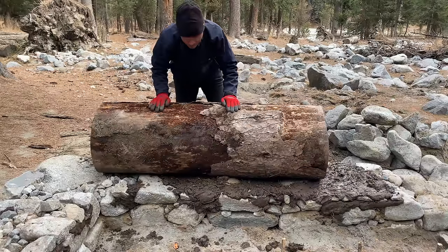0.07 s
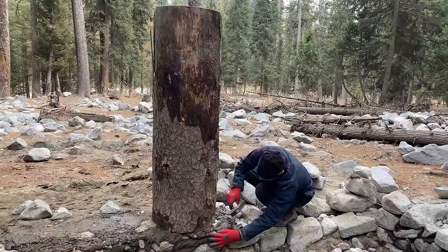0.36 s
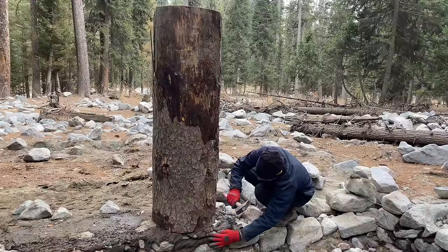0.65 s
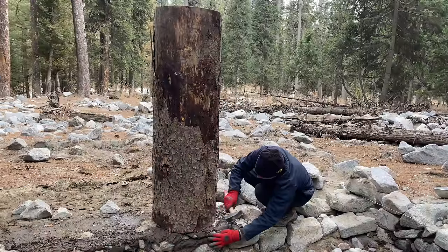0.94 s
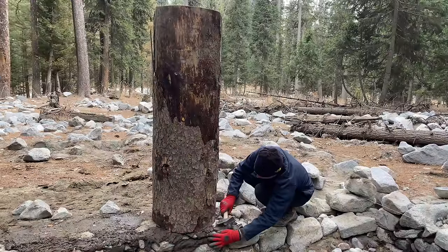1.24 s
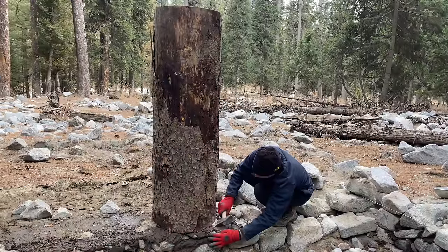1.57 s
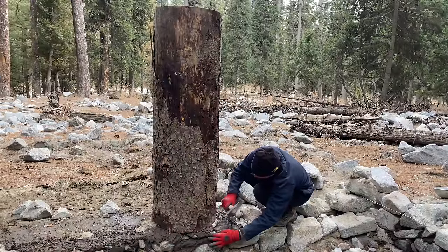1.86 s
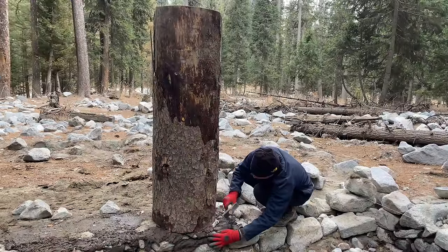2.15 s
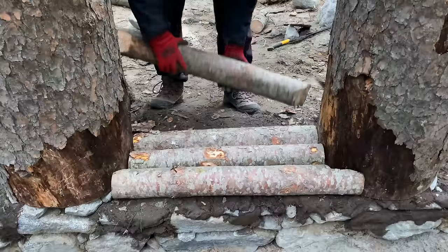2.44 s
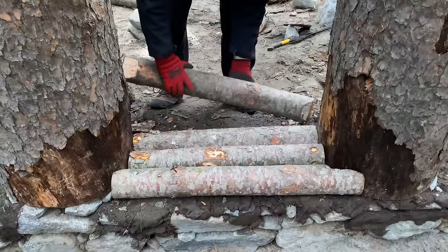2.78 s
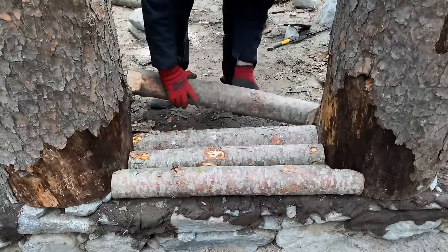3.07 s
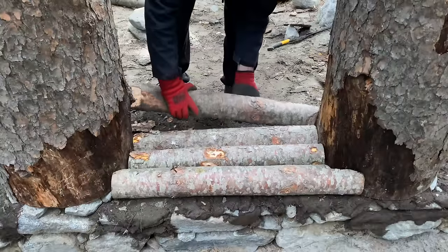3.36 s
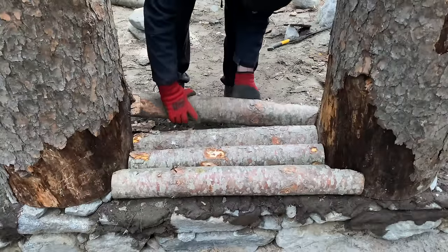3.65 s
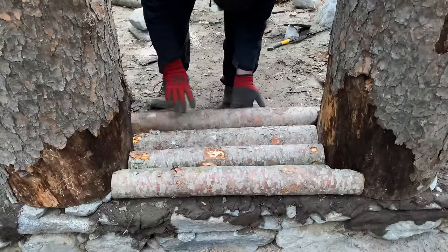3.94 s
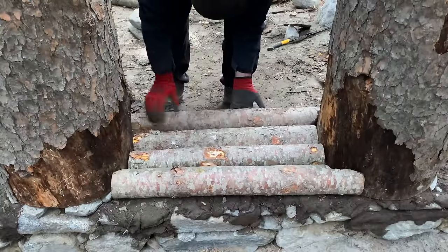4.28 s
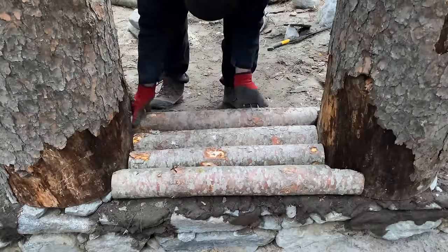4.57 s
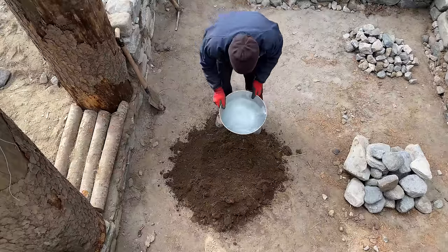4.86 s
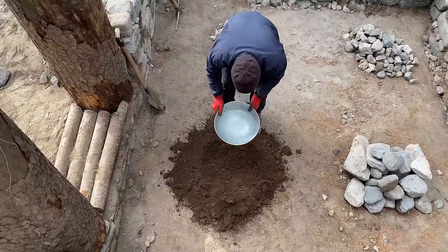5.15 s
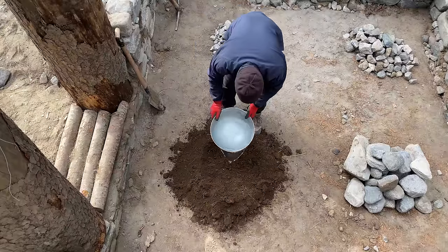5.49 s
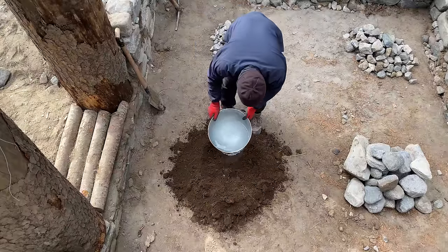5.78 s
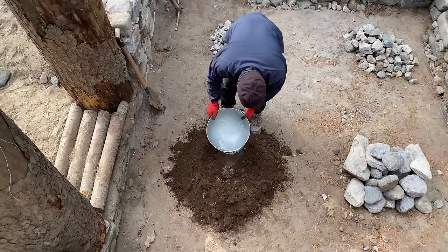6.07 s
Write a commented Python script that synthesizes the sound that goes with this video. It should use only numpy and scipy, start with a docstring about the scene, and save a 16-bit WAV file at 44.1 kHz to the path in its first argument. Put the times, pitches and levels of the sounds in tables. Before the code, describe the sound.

A hammer knocks a steel wedge into wood four times in a quiet forest; later a pole knocks into place and water trickles onto soil.

```python
"""Four hammer blows drive a steel wedge at the foot of an upright log in a conifer forest.
Each blow crushes fibres and makes wood and steel ring; the trees throw back a faint echo.
Then gloves rustle on bark, a wooden pole drops into place, and water starts to pour from a basin,
pattering on loose soil. A distant hush and a low rumble of air lie under everything;
wind puffs twice at the start, and a far stream comes in near the end."""
import sys
import numpy as np
from scipy import signal
from scipy.fft import rfft, irfft, next_fast_len
from scipy.io import wavfile

SR = 44100
rng = np.random.default_rng(int(sys.argv[2]) if len(sys.argv) > 2 else 0)


def generate_wav(signal):
    """Clip the signal to [-1, 1] and save it as 16-bit WAV at the path in sys.argv[1]."""
    frames = np.transpose(np.atleast_2d(signal))
    scaled = np.clip(frames, -1, 1) * 32767
    pcm = np.round(scaled).astype(np.int16)
    wavfile.write(sys.argv[1], SR, pcm)


N = 278756
TIME = np.arange(N) / SR
AGE = TIME[:SR]   # the first second after a hit

# low rumble of the air: (frequency [Hz], level [dB per Hz])
RUMBLE = [(22, -26.5), (45, -5), (65, 3), (91, 2), (129, -4.5), (166, -6), (220, -14.5)]
# distant hush of the forest: (frequency [Hz], level [dB per Hz])
HUSH = [(88, -36), (150, -7), (178, -7), (283, -9.5), (371, -8), (589, -7), (757, -11), (1110, -16),
        (1270, -16.5), (1730, -18.5), (3030, -30.5), (7500, -44.5), (8250, -49.5), (10600, -41),
        (15000, -64.5)]
# the far stream: (frequency [Hz], level [dB per Hz])
STREAM = [(250, -9.5), (340, 0.5), (470, -2), (600, -6), (800, -19), (1500, -17), (2200, -26.5)]
# wind on the microphone: (frequency [Hz], level [dB per Hz])
WIND = [(26, -22), (44, -5), (70, -10.5), (140, -40)]
# puffs of that wind: (time [s], level [dB])
PUFFS = [(0.02, -49.5), (0.155, -48.5)]

# bits of bark falling away: (frequency [Hz], level [dB per Hz])
CRUMBS = [(1800, -13.5), (2700, -2), (3400, 2), (4200, -6), (5200, 2), (6200, -4), (7200, -13),
          (11000, -29.5), (15000, -30.5)]
# bark and grit ticking: (time [s], level [dB])
TICKS = [(0.093, -48), (0.106, -54), (1.1595, -36), (2.543, -44), (2.582, -52), (2.627, -47), (2.760, -51),
         (2.778, -54), (4.491, -52)]
# cloth on bark: (frequency [Hz], level [dB per Hz])
CLOTH = [(1200, -12), (2500, 0), (4000, -2.5), (6000, -6), (8000, -8), (10000, 2.5), (12000, -12.5),
         (14000, -8.5), (16000, -16)]
# cloth strokes: (full-speed time [s], relative level [dB], swell [s], hold [s], fade [s], cutoff [Hz])
STROKES = [(0.09, -77, .06, .02, .15, 19000), (0.25, -79, .03, .1, .2, 19000),
           (2.24, -82.5, .04, .28, .05, 19000), (2.54, -71.5, .05, .21, .08, 19000),
           (2.76, -66, .012, .005, .06, 19000), (3.29, -62.5, .04, .008, .085, 10000),
           (3.51, -67.5, .13, .015, .09, 10000), (3.775, -56.5, .07, .082, .065, 19000),
           (4.108, -66.5, .035, .004, .16, 19000), (4.265, -65.5, .055, .012, .135, 19000),
           (4.47, -61, .085, .022, .018, 19000), (4.575, -73, .04, .09, .08, 19000),
           (4.705, -70.5, .08, .023, .012, 19000)]

# water pattering on soil: (frequency [Hz], level [dB per Hz])
PATTER = [(900, -10), (2000, -4.5), (3300, -2), (4500, -3.5), (6500, -7), (8000, -5), (10000, -2.5),
          (12000, -12), (14000, -14), (16000, -24)]
# sloshes that bring more water at once: (time [s], relative level [dB])
SLOSHES = [(5.617, -62.5), (5.785, -65.5), (6.055, -64.5), (6.105, -60), (6.265, -64.5)]
# fat drops splashing: (time [s], level [dB], pitch [Hz])
SPLASHES = [(5.622, -65, 3400), (5.758, -51, 3200), (5.792, -51, 4000), (6.047, -57, 3700),
            (6.053, -45, 2780), (6.167, -55, 4200), (6.296, -47.5, 3900)]

# the pole's end sliding down the trunk: (full-speed time [s], level [dB], swell [s], hold [s], fade [s])
POLE_SLIDE = (3.944, -53, .028, .012, .075)
# wood scraping on bark: (frequency [Hz], level [dB per Hz])
SCRAPING = [(2500, -12), (4000, -8.5), (6500, -9), (7800, 0), (9800, 1), (11500, -7.5), (15000, -17)]
# bark snapping on bark: (frequency [Hz], level [dB per Hz])
BARK = [(1500, -3), (2100, 6), (2900, -4), (3700, 5), (4600, -9), (7000, -13), (9500, -2), (12000, -13),
        (15000, -17)]
# the pole landing on its neighbours: (time [s], click [dB], knock [dB], bed [dB], ground [dB])
POLE_DROPS = [(3.9720, -17.3, -23.5, -64, -61), (3.9840, -39, -59, -21.3, -38), (4.057, -75, -75, -51, -47)]
# the pole ringing: (pitch [Hz], level [dB], ring time [s])
POLE_TONES = [(265, -5, 0.065), (324, -8.5, 0.1), (420, -17, 0.039), (478, 1.5, 0.055), (650, -7.5, 0.035),
              (804, -6, 0.028), (1000, -16, .04)]
# its bed, the row of poles and soil that carry it: (pitch [Hz], level [dB], ring time [s])
BED_TONES = [(122, -3, 0.086), (173, 0, 0.058), (406, -6.5, 0.14)]
# the ground thudding: (frequency [Hz], level [dB per Hz])
GROUND = [(35, -16), (70, -1), (130, -3.5), (250, -1.5), (400, -12), (900, -37.5)]

# hammer blows: (time [s], crack [dB], crack pitch [Hz], splinters [dB], crush time [s],
# splinter cutoff [Hz], knock [dB], clack [dB], trunk [dB], wedge [dB], hammer head [dB], ground [dB])
BLOWS = [(0.7517, -4, 2760, -18, 0.039, 6000, -23.5, -45, -32, -30.5, -32, -34),
         (1.1685, -4.5, 3500, -21, 0.046, 9424, -19.3, -35, -27, -12, -32, -37),
         (1.5381, -9, 3290, -17, 0.041, 8550, -14, -21.5, -36.5, -14.5, -26, -29.5),
         (1.9056, -13.5, 2070, -15.5, 0.023, 5700, -12.8, -15.2, -20.5, -39.5, -37.5, -33)]
# crushed fibres and grit: (frequency [Hz], level [dB per Hz])
SPLINTERS = [(200, -12.5), (400, -3.5), (800, -0.5), (1100, -3), (1700, -6.5), (2300, -5.5), (3400, -2),
             (4500, -6.5), (6000, -8.5), (8000, -11), (11000, -10), (15000, -24.5)]
# wood around the wedge: (pitch [Hz], level [dB], ring time [s])
KNOCK_TONES = [(495, -9, 0.08), (584, 0.5, 0.056), (690, -4.5, .055), (803, -4, 0.066), (881, -4, .032),
               (1290, -16, .035), (2940, -12, 0.039), (3230, -17, .035), (3543, -14.5, 0.031)]
# the stiff lip of the cut: (pitch [Hz], level [dB], ring time [s])
CLACK_TONES = [(1861, -10, 0.027), (2223, 0.5, 0.035), (4310, -8, 0.028), (5360, -10.5, .025)]
# the whole trunk: (pitch [Hz], level [dB], ring time [s])
TRUNK_TONES = [(379, 1.5, .085), (411, -4, 0.11), (436, -2, 0.19)]
# the steel wedge, damped by the wood that grips it: (pitch [Hz], level [dB], ring time [s])
WEDGE_TONES = [(6600, -7.5, .04), (6745, -1, .05), (6934, -6.5, .04), (9900, -16, .025), (10170, -5, .04),
               (10250, -15.5, 0.033), (11100, -15, 0.053), (10930, -14.5, 0.034)]
# the hammer head: (pitch [Hz], level [dB], ring time [s])
HEAD_TONES = [(9430, 2.5, .095), (13562, -12, .09), (14782, -15, .045)]
# sound thrown back by the trees: (frequency [Hz], level [dB per Hz])
TREE_ECHO = [(200, -5.5), (600, 0), (1300, -4.5), (2500, -0.5), (3800, -2.5), (5500, -8), (7000, -13.5),
             (8500, -23.5), (11000, -21), (15000, -33.5)]

# how alike the air sounds on both sides: (frequency [Hz], likeness [0-1])
AIR_LIKENESS = [(60, 1), (290, 0.7), (640, 0.5), (1400, .35), (3100, .5), (7000, .3), (15000, .1)]
# how much louder the background is on the left: (frequency [Hz], left minus right [dB])
AIR_BALANCE = [(60, 3), (110, 5), (200, 8), (380, 4.5), (700, 2), (1300, 5), (2400, 8), (4400, 10.5),
               (8000, 3), (15000, -3.5)]
# the same for near sounds: (frequency [Hz], left minus right [dB])
NEAR_BALANCE = [(60, 2.5), (200, 9), (400, 5.5), (700, 5.5), (1300, 7.5), (2400, 11), (4400, 9.5),
                (6800, 6.5), (9000, 0.5), (15000, -.5)]
# how far near sounds run ahead on the left: (frequency [Hz], phase lead [radians])
NEAR_LEAD = [(300, -0.12), (850, .5), (1350, -.6), (2000, .1), (3000, -0.91), (4200, 0.41), (5500, 2.04),
             (6700, 1.06), (9000, 0.19), (15000, 0)]
# resonances of the left microphone opening: (frequency [Hz], sharpness [Q])
MIC_RESONANCES = [(8450, 6), (12250, 9.5)]


def from_db(db):
    """Turn decibels into a volume factor."""
    return 10 ** (np.asarray(db) / 20)


def unit_power(x):
    """Scale a signal to an average power of 1."""
    return x / np.sqrt(np.mean(x ** 2) + 1e-20)


def at_hz(points, hz):
    """Read between a table's rows on a log frequency scale."""
    known_hz, values = np.transpose(points)
    return np.interp(np.log(np.maximum(hz, 1)), np.log(known_hz), values)


def noise(spectrum, likeness, size=SR):
    """Stereo noise shaped by a table; likeness 1 makes both sides the same, 0 unrelated."""
    hz = np.arange(size // 2 + 1) * SR / size
    alike = np.clip(likeness if np.isscalar(likeness) else at_hz(likeness, hz), 0, 1)
    treble_cut = 1 / (1 + (hz / spectrum[-1][0]) ** 8)
    bass_cut = 1 - 1 / (1 + (hz / spectrum[0][0]) ** 4)
    colour = from_db(at_hz(spectrum, hz)) * treble_cut * bass_cut
    mid, side = rfft(rng.standard_normal((2, size))) * colour
    stereo = np.sqrt(1 + alike) * mid + np.sqrt(1 - alike) * side * [[1], [-1]]
    return unit_power(irfft(stereo, size))


def add(track, s, sound):
    """Mix a sound in from time s."""
    start = int(round(s * SR))
    track[..., start:start + sound.shape[-1]] += sound[..., :N - start]


def low_pass(x, hz):
    """Soften the treble above the cutoff hz."""
    return signal.sosfilt(signal.butter(2, min(hz, .45 * SR), fs=SR, output="sos"), x)


def fade(rise_s, ring_s):
    """Volume that rises, then dies away by 60 dB over the ring time."""
    return (1 - np.exp(-(AGE / rise_s) ** 2)) * from_db(-60 * AGE / ring_s)


def swell(s, db, swell_s, hold_s, fade_s):
    """Volume that peaks at time s, holds and fades; swell and fade times each span 20 dB."""
    early = np.maximum(s - TIME, 0)
    late = np.maximum(TIME - s - hold_s, 0)
    return from_db(db - 20 * np.minimum(early / swell_s + late / fade_s, 10))


def sets_in(s, db, swell_s, db_per_s):
    """Volume that reaches its level at time s, then keeps growing slowly."""
    return swell(s, db, swell_s, N / SR, 1) * from_db(db_per_s * np.maximum(TIME - s, 0))


def ring(tones, rise_s):
    """A struck object's dying tones, each about a decibel different on every hit."""
    out = np.zeros(SR)
    for k, (hz, db, ring_s) in enumerate(tones):
        strength = (-1) ** k * from_db(db + rng.standard_normal())
        out += strength * fade(rise_s, ring_s) * np.sin(2 * np.pi * hz * AGE)
    return out


def crack(hz, cycles):
    """Two hard things meet: a pressure pulse a wave or two long."""
    progress = AGE * hz / cycles
    return progress ** 2 * np.exp(2 - 2 * progress) * np.sin(2 * np.pi * hz * AGE)


def grains(per_s, spread_db):
    """Flickering volume from tiny random contacts, each about a millisecond long."""
    sizes = from_db(spread_db * np.minimum(rng.exponential(1, N), 4))
    contacts = sizes * (rng.random(N) < per_s / SR)
    power = signal.lfilter([1], [1, -np.exp(-1000 / SR)], contacts ** 2 + 1e-12)
    return unit_power(np.sqrt(power))


def forest_air():
    """The air rumbles steadily under the forest's distant hush."""
    rumble = from_db(-54.2) * noise(RUMBLE, AIR_LIKENESS, size=N)
    hush = from_db(-52.75) * noise(HUSH, AIR_LIKENESS, size=N)
    return rumble + hush


def far_stream():
    """Distant running water comes in and slowly grows louder."""
    return sets_in(s=4.76, db=-53.6, swell_s=.06, db_per_s=1.2) * noise(STREAM, .49, size=N)


def wind_puffs():
    """Wind bumps the microphone with two low puffs."""
    puffs = sum(swell(s, db, swell_s=.04, hold_s=.045, fade_s=.05) for s, db in PUFFS)
    return puffs * noise(WIND, .8, size=N)


def bark_ticks():
    """Crumbs of bark and grit snap."""
    out = np.zeros((2, N))
    for s, db in TICKS:
        add(out, s, from_db(db) * noise(CRUMBS, .99) * fade(rise_s=.0004, ring_s=.0079))
    return out


def glove_rustle():
    """Gloves and jacket slide over bark in short grainy strokes, some duller than others."""
    cloth = from_db(2.5) * grains(per_s=3800, spread_db=3.5) * noise(CLOTH, .46, size=N)
    return sum(swell(*shape) * low_pass(cloth, cutoff_hz) for *shape, cutoff_hz in STROKES)


def pouring_water():
    """Sloshing water breaks into drops that patter on soil; the fattest splash at their own pitch."""
    flow = sets_in(s=5.612, db=-62.3, swell_s=.045, db_per_s=4.6)   # grows as the basin tilts
    flow += sum(swell(s, db, swell_s=.03, hold_s=.012, fade_s=.065) for s, db in SLOSHES)
    out = from_db(1.44) * flow * grains(per_s=2400, spread_db=2.5) * noise(PATTER, .86, size=N)
    for s, db, hz in SPLASHES:
        cavity = [(hz / 2, -26), (hz, 0), (hz * 2, -30)]
        add(out, s, from_db(db) * noise(cavity, .96) * fade(rise_s=.0011, ring_s=.036))
    return out


def dropped_pole():
    """The pole scrapes down, bark clicks on bark, then its weight sets the bed ringing and settles."""
    out = swell(*POLE_SLIDE) * grains(per_s=2500, spread_db=2.5) * noise(SCRAPING, .7, size=N)
    for s, click_db, knock_db, bed_db, ground_db in POLE_DROPS:
        bark = from_db(-9.5) * noise(BARK, .98) * fade(rise_s=.00013, ring_s=.017)
        click = from_db(click_db) * (crack(hz=3160, cycles=.7) + bark)
        knock = from_db(knock_db) * ring(POLE_TONES, rise_s=.0033)
        bed = from_db(bed_db) * ring(BED_TONES, rise_s=.004)
        thud = low_pass(noise(GROUND, .71), hz=129) * fade(rise_s=.0071, ring_s=.32)
        add(out, s, click + knock + bed + from_db(ground_db) * thud)
    return out


def falling_crumbs(force_db):
    """Bits of bark fall after a blow, louder after a harder knock."""
    crackle = noise(CRUMBS, .8) * grains(per_s=250, spread_db=.5)[:SR]
    return from_db(-43 + force_db) * crackle * fade(rise_s=.039, ring_s=.24)


def tree_echo(force_db, steel):
    """The trees scatter a blow back, and the steel's ping lingers among the trunks."""
    wash = from_db(-54 + force_db) * noise(TREE_ECHO, .55) * fade(rise_s=.028, ring_s=.55)
    scatter = rng.standard_normal((2, SR)) * fade(rise_s=.03, ring_s=.62) / np.sqrt(SR)
    ping = from_db(-17) * signal.fftconvolve(steel[None], scatter, axes=1)[:, :SR]
    return wash + ping


def hammer_blows():
    """Each blow cracks, crushes fibres, rings wood and steel, shakes the ground and echoes."""
    out = np.zeros((2, N))
    for (s, crack_db, crack_hz, splinter_db, crush_s, cutoff_hz,
         knock_db, clack_db, trunk_db, wedge_db, head_db, ground_db) in BLOWS:
        contact = from_db(crack_db) * crack(crack_hz, cycles=.58)
        crush = fade(rise_s=.0001, ring_s=crush_s)
        crush += from_db(-24) * fade(rise_s=.0086, ring_s=.13)   # nearby stones make it last longer
        splinters = from_db(splinter_db) * low_pass(noise(SPLINTERS, .94) * crush, cutoff_hz)
        knock = from_db(knock_db) * ring(KNOCK_TONES, rise_s=.0013)
        clack = from_db(clack_db) * ring(CLACK_TONES, rise_s=.0005)
        trunk = from_db(trunk_db) * ring(TRUNK_TONES, rise_s=.003)
        wedge = from_db(wedge_db) * ring(WEDGE_TONES, rise_s=.00054)
        head = from_db(head_db) * ring(HEAD_TONES, rise_s=.0006)
        ground = from_db(ground_db) * noise(GROUND, 1.0) * fade(rise_s=.002, ring_s=.13)
        force_db = .62 * (knock_db + 17.5)   # zero for a typical knock of -17.5 dB
        crumbs = falling_crumbs(force_db)
        echo = tree_echo(force_db, steel=wedge + from_db(-8) * head)
        add(out, s, contact + splinters + knock + clack + trunk + wedge + head + ground + crumbs + echo)
    return out


def lean_left(x, balance, lead=((1, 0), (SR, 0))):
    """The two microphone openings hear each frequency at their own level and timing."""
    size = next_fast_len(N + SR // 10)
    hz = np.arange(size // 2 + 1) * SR / size
    ratio = from_db(at_hz(balance, hz))
    right_lag = np.exp(-1j * at_hz(lead, hz))
    sides = 2 * np.array([ratio, right_lag]) / (1 + ratio)
    return irfft(rfft(x, size) * sides, size)[:, :N]


def scene():
    """Woodwork and water close by, in front of the forest background."""
    woodwork = hammer_blows() + dropped_pole() + bark_ticks() + glove_rustle()
    near = lean_left(woodwork, NEAR_BALANCE, NEAR_LEAD) + lean_left(pouring_water(), NEAR_BALANCE)
    background = forest_air() + far_stream() + wind_puffs()
    return near + lean_left(background, AIR_BALANCE)


def record(dry):
    """The left opening shifts the treble's timing, big peaks are rounded, the highest treble is cut."""
    left, right = dry
    for hz, q in MIC_RESONANCES:
        notched = signal.lfilter(*signal.iirnotch(hz, q, fs=SR), left)
        left = 2 * notched - left   # changes phase, not level
    both = np.array([left, right])
    rounded = both / (1 + both ** 6) ** (1 / 6)
    treble_cut = signal.cheby2(16, 70, 16800, fs=SR, output="sos")   # 70 dB down from 16800 Hz
    return signal.sosfilt(treble_cut, rounded)


dry = scene()
out = record(dry)
generate_wav(out)
```